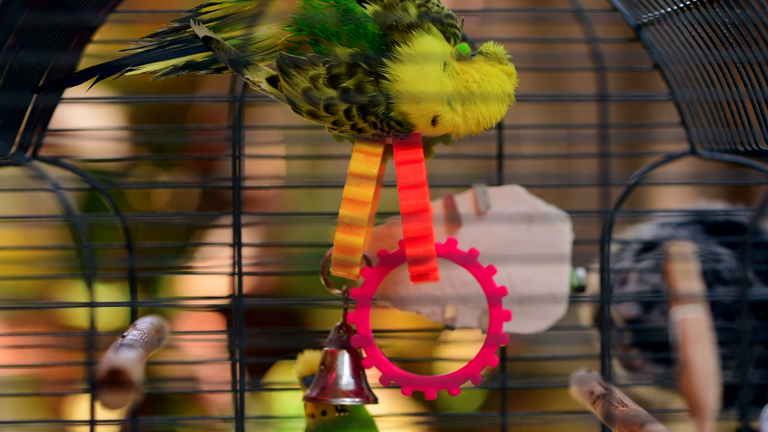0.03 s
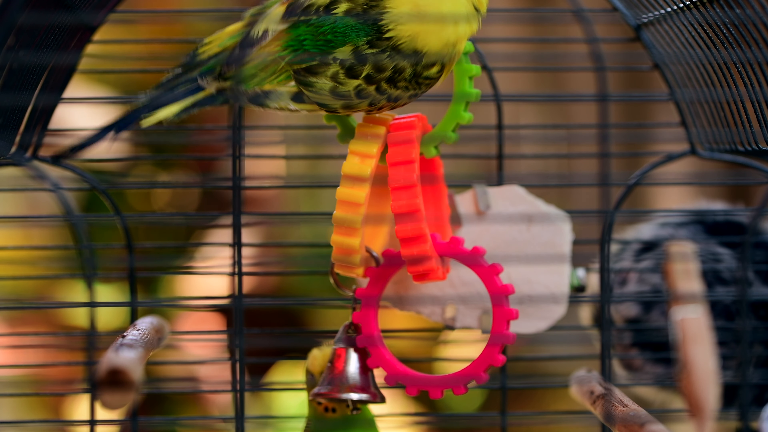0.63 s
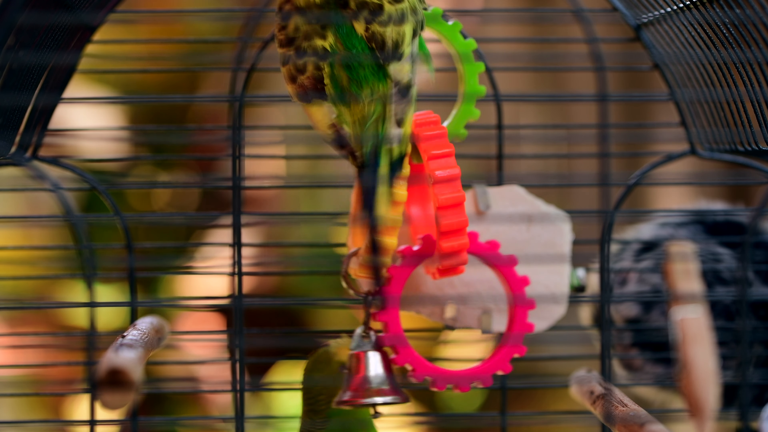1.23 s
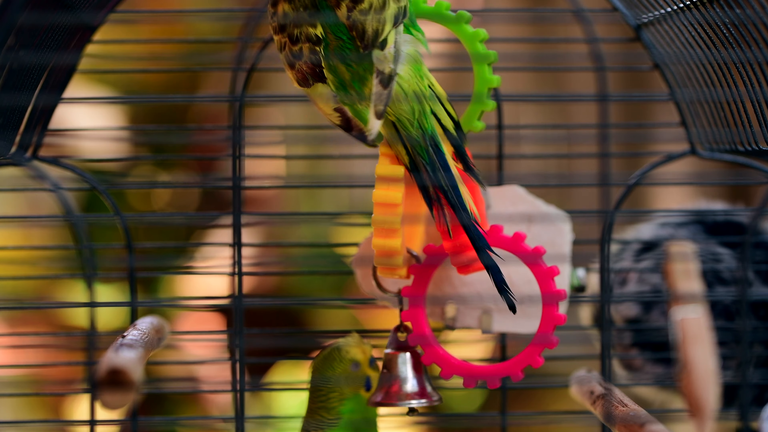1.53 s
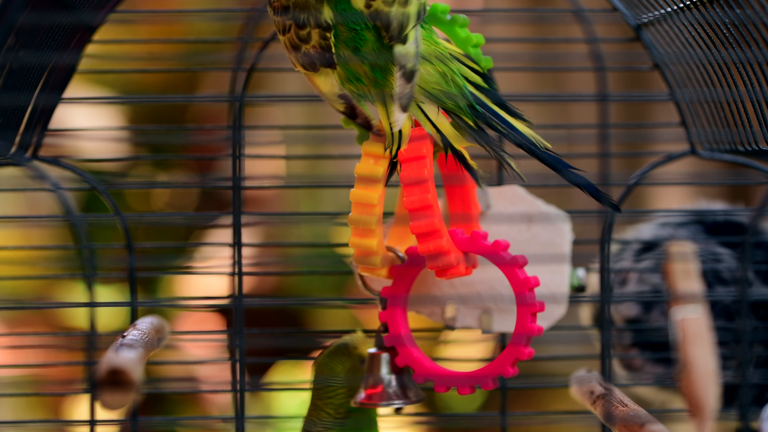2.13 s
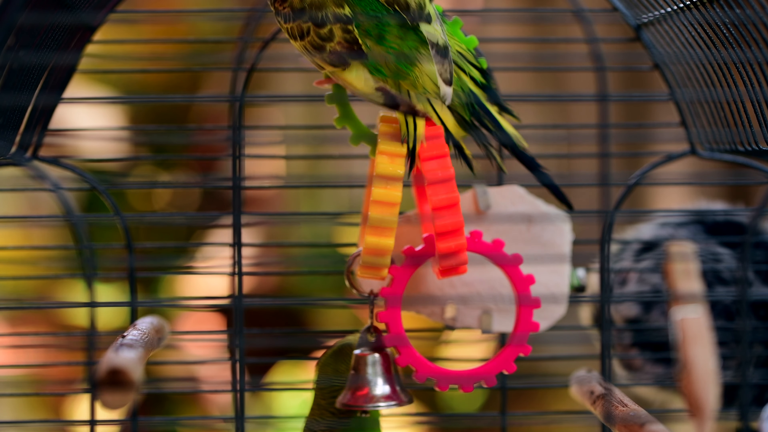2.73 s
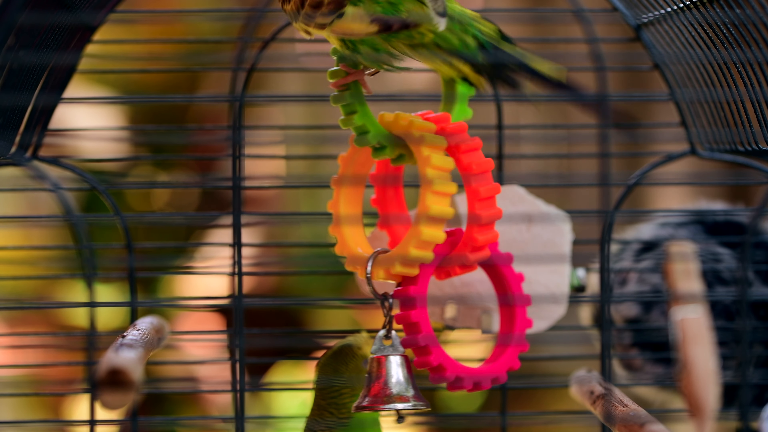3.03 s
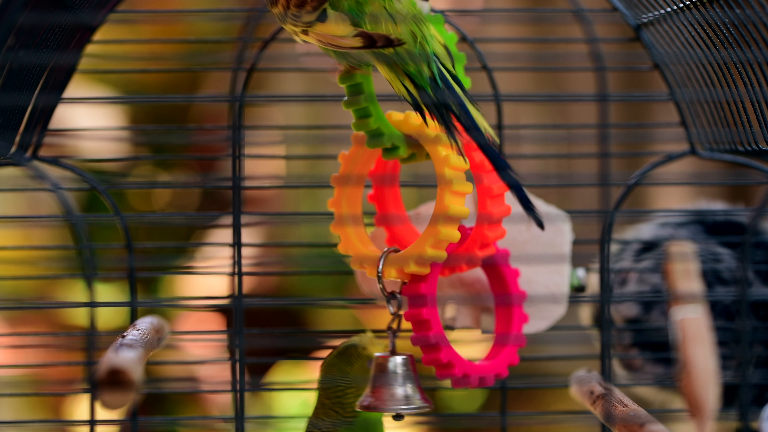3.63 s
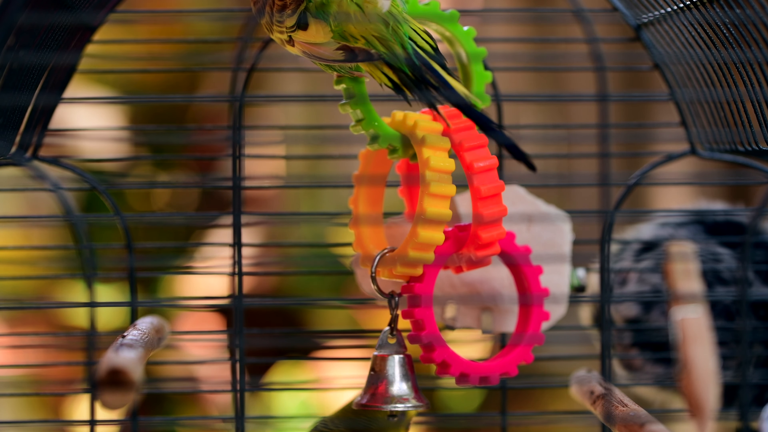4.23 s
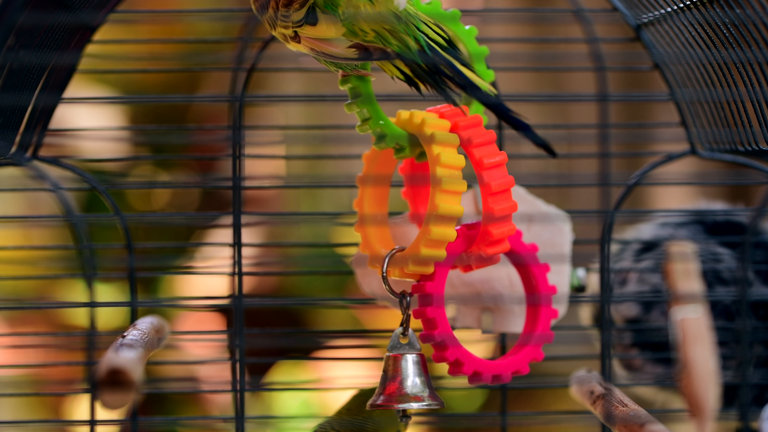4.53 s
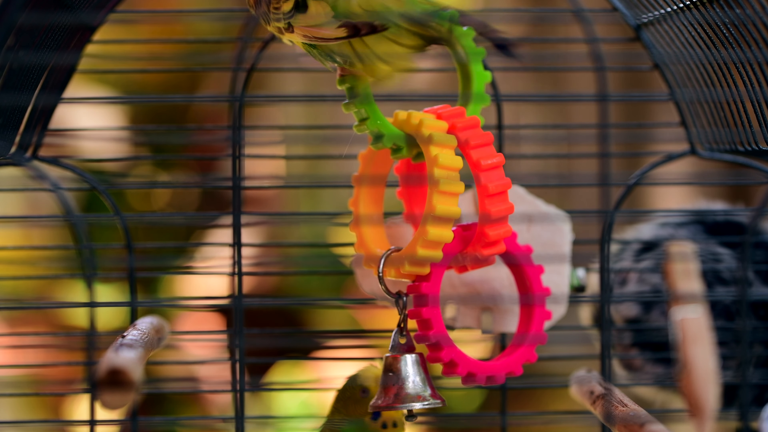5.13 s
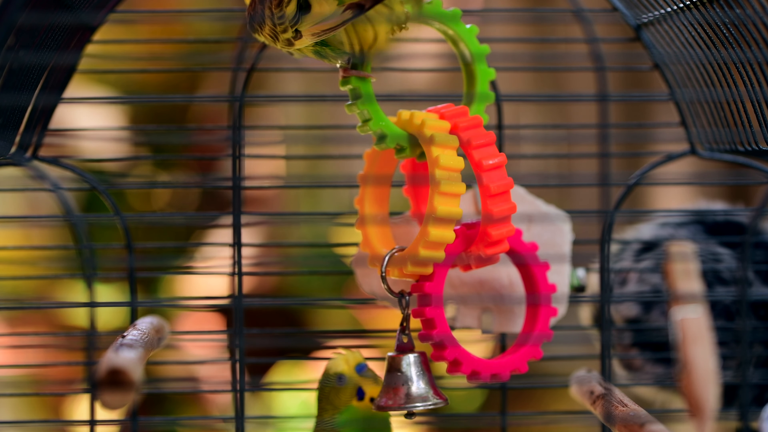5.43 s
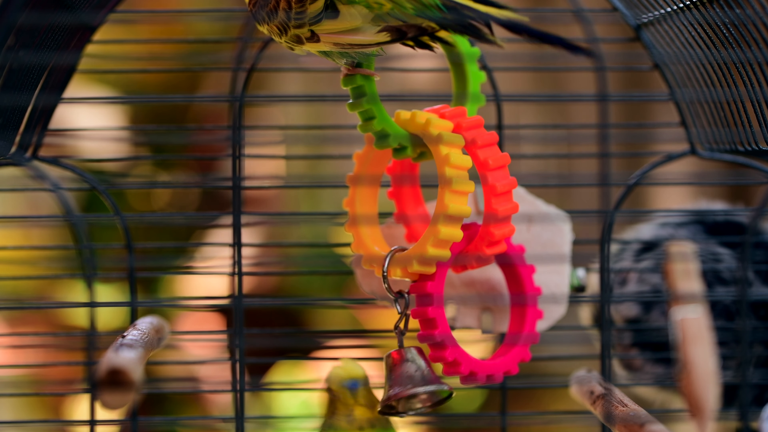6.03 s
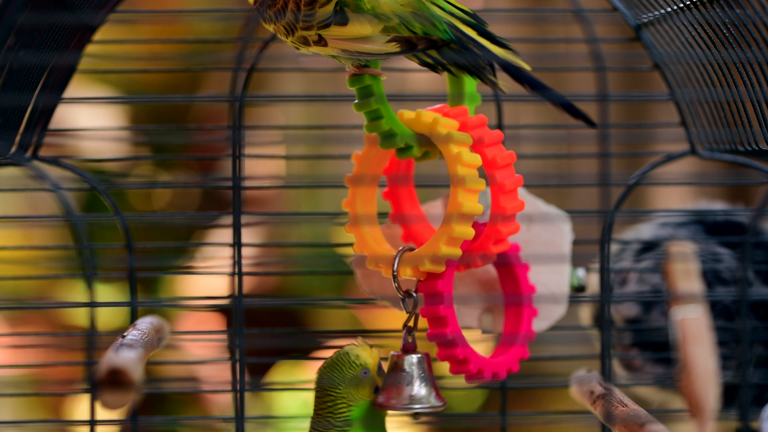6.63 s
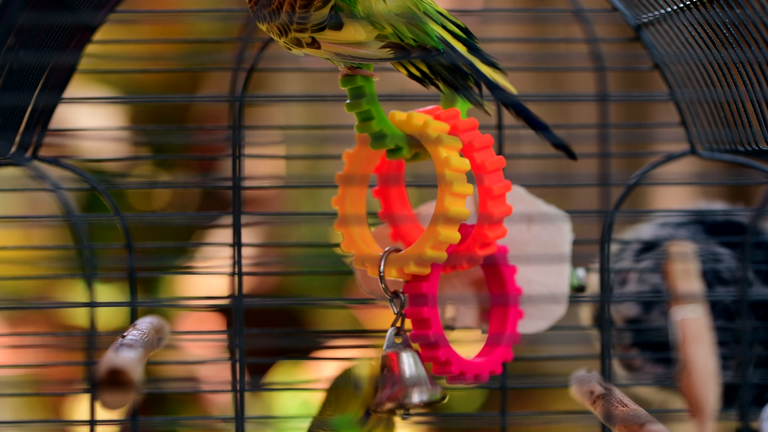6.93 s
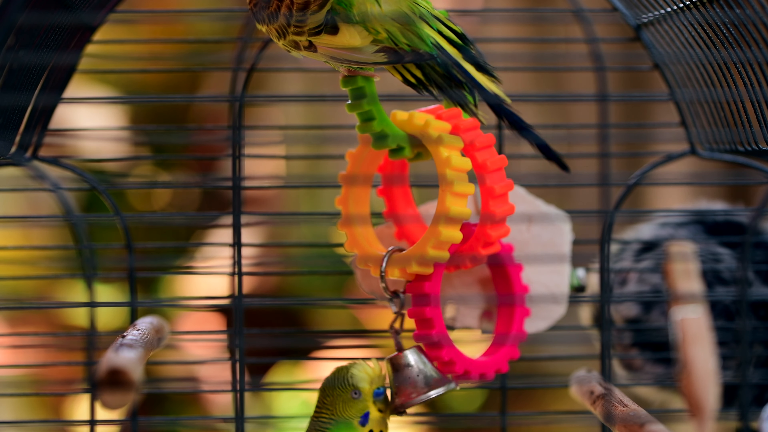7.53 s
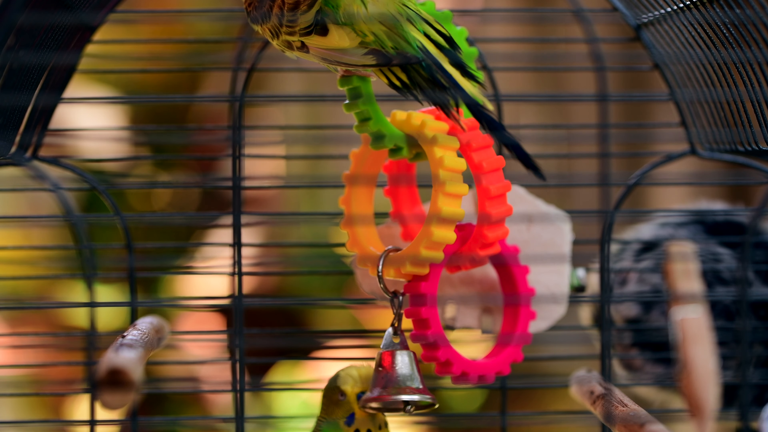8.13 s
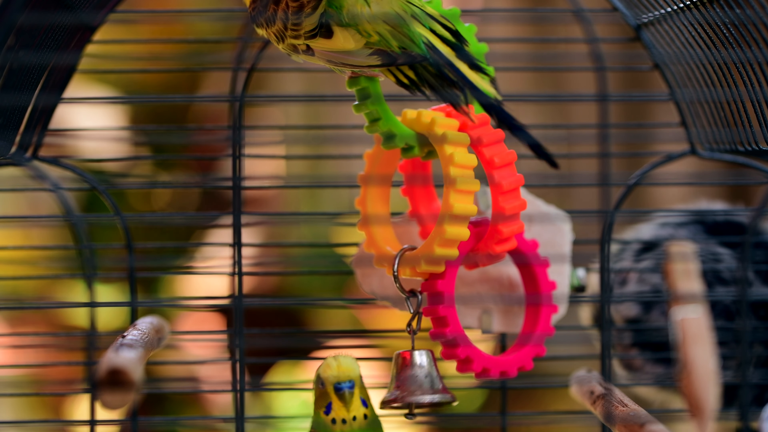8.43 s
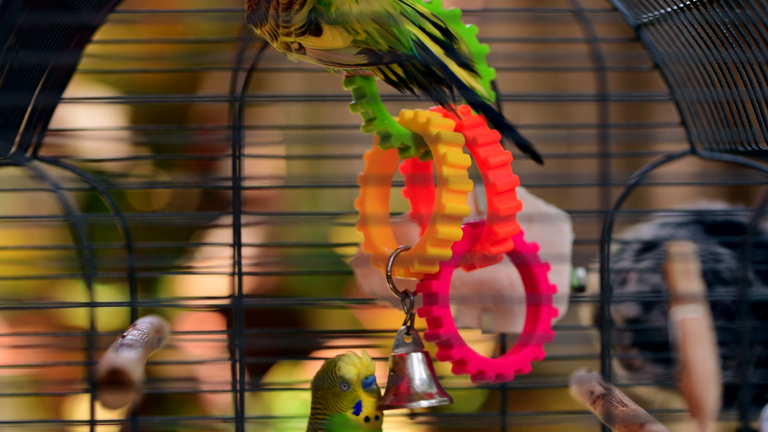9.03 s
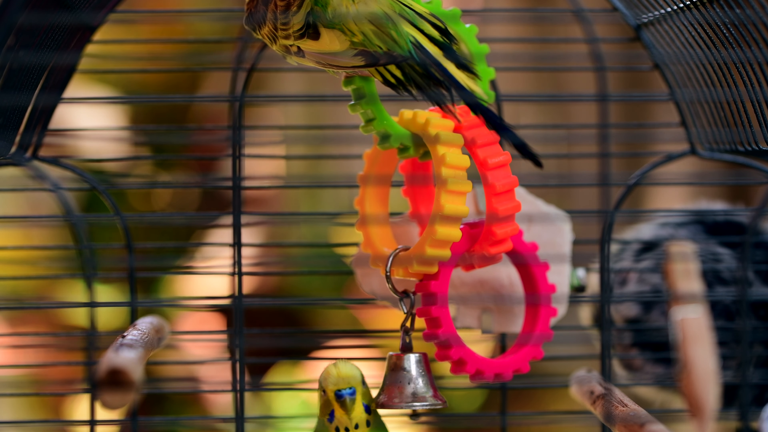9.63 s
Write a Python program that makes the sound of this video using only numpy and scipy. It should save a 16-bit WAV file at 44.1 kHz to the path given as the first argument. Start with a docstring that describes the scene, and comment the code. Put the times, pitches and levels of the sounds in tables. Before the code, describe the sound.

In a quiet room with a faint hum, a caged budgerigar is heard up close. It opens with a loud falling chirp and tiny, soft warbled notes, then breaks into a string of raspy squawks. As these slow down, a nudged toy bell tinkles gently, and a burst of sharp chirps and a last squawk follow. Light ticks of beak and claws on plastic come now and then.

```python
"""A budgerigar chirps and warbles softly, close by in a quiet room, one of two in a wire cage.
Then comes a run of harsh, rattling squawks and a few more whistled chirps. The whistles are nearly pure
sliding tones; in a squawk the syrinx (the bird's voice box) snaps open about 170 times a second.
Now and then a nudged toy bell rings, and beaks and claws tick on plastic rings.
The cage and walls add a faint echo, and the loudest bursts overload the microphone."""
import sys
import numpy as np
from scipy import signal
from scipy.fft import rfft, irfft, next_fast_len
from scipy.io import wavfile
from scipy.ndimage import map_coordinates

SR = 44100
rng = np.random.default_rng(int(sys.argv[2]) if len(sys.argv) > 2 else 0)


def log_audio(samples):
    """Write samples as a 16-bit WAV file to the path given in sys.argv[1]."""
    # one column per channel
    frames = np.atleast_2d(samples).T
    # limit to full scale, then quantise
    limited = np.clip(frames, -1, 1)
    pcm = np.round(limited * 32767).astype(np.int16)
    wavfile.write(sys.argv[1], SR, pcm)


N = 435266
TIME = np.arange(N) / SR

# The tone colour of the quiet room. Each row: frequency in Hz, relative level in dB.
ROOM_COLOUR = [(20, -9), (50, -1), (95, -9), (170, -10), (300, -17), (750, -21), (1200, -27), (2100, -39),
               (5200, -47), (15500, -55)]
# How alike the room sounds on the left and right. Each row: frequency in Hz, likeness from 0 to 1.
ROOM_LIKENESS = [(60, 0.6), (400, 0), (950, 0.7), (3800, 0.4), (12000, 0.04)]
# A faint hum. Each row: pitch in Hz, level in dB.
HUM_TONES = [(39, -58), (237, -59)]
# The tone colour of the echo. Each row: frequency in Hz, relative level in dB.
ECHO_COLOUR = [(200, -0.5), (1200, -4.5), (2700, 5.5), (5300, 0), (7000, -1), (15000, -7.5)]
# Where the calling bird is. Each row: time in seconds, left level minus right level in dB.
BIRD_PLACE = [(.4, -1.8), (3.5, -3.4), (4.2, -1.7), (5.3, -1.7), (5.8, -3.2), (8.2, -1.8), (9.1, .6)]
# How the left side lags. Each row: frequency in Hz, phase shift in radians (negative is later).
LEFT_PHASE = [(1200, 0), (4700, -.55), (7750, -.6), (11200, -2.4), (15000, -2.6)]

# Beaks and claws on plastic. Each row: start in seconds, peak in dB, favoured pitch in Hz.
TAPS = [(0.831, -34, 1820), (0.875, -41, 1700), (0.951, -35, 1490), (1.045, -24.5, 2020),
        (1.053, -27, 2000), (3.36, -30.5, 4970), (4.0202, -25.5, 2700), (4.0252, -27, 2680),
        (9.667, -27.5, 1890), (9.725, -30, 1820)]
# The plastic's own tones. Each row: pitch in Hz, relative level in dB, seconds to fade by 60 dB.
PLASTIC_TONES = [(942, -9.5, .008), (1550, -4.5, 0.0018), (2200, 2, 0.0063), (2880, 2, 0.0018),
                 (5500, -3, 0.0021), (12500, -18, 0.0024)]
# The pitches of the bell's tones in Hz, lowest first.
BELL_PITCHES = [2293, 7097, 10230, 10652, 14690]
# How each of those tones rings. Each row: relative level in dB, seconds to fade by 60 dB.
BELL_RINGING = [(-4.5, 0.93), (2, 0.42), (-10, 0.48), (3.5, 0.28), (-6, .34)]
# The clapper hits the bell. Each row: start in seconds, level in dB, extra dB for the lowest tone.
BELL_STRIKES = [(3.27, -78.5, 24), (3.81, -69, 19), (6.176, -31, 0), (6.621, -43.5, -8.5),
                (7.09, -32, -4.5), (7.678, -44, -14), (8.163, -32, -12.5), (8.846, -39.5, 5)]

# How throat and beak favour a whistle's overtones. Each row: frequency in Hz, boost in dB.
BEAK_COLOUR = [(2000, 25), (3400, -9.5), (4700, -10.5), (6300, -1.5), (7300, 11.5), (9000, -0.5),
               (14000, 15.5)]
# Soft sliding notes. Each row: start and length in seconds, first and last pitch in Hz,
# level in dB, roughness from 0 to 1.
WARBLE_NOTES = [(0.384, 0.01, 1490, 1780, -40, 0.5), (0.973, 0.0203, 800, 1310, -51.5, 0.85),
                (0.989, 0.015, 1280, 1010, -43, 0.3), (1.154, 0.009, 1680, 1880, -37.5, 0.3),
                (1.208, 0.027, 1174, 1410, -45.5, 0.3), (1.282, 0.0062, 1860, 2410, -40, 0),
                (1.43, 0.015, 2415, 1670, -42.5, 0.64), (1.439, 0.015, 1570, 2180, -35, 0.4),
                (1.594, 0.017, 2014, 1570, -44.5, 0.6), (1.726, 0.0061, 2080, 2760, -37.5, 0.2),
                (2.599, 0.018, 900, 2210, -28.5, 0.7), (2.623, 0.048, 1650, 1254, -39, 0.05),
                (2.674, 0.071, 1073, 1073, -46, 0), (2.751, 0.0085, 3820, 3590, -37, 0.84),
                (2.787, 0.055, 2185, 1517, -31.5, 0.42), (8.707, 0.0091, 1394, 1550, -39.5, 0.37),
                (8.786, 0.016, 4050, 3330, -38.5, 0.4), (9.081, 0.02, 1330, 1630, -36, 0.05)]
# A three-note tune. Its rows read like the warble's, timed from the start of the tune.
TUNE_NOTES = [(0, 0.0087, 1550, 1940, -37, 0.21), (0.018, 0.0278, 798, 1265, -44, 0.17),
              (0.07, .013, 2430, 3110, -43.5, .3)]
# When the tune is sung. Each row: start in seconds, change of level in dB.
TUNE_REPEATS = [(1.78, -4), (1.908, -2.5), (2.041, -2), (2.173, -1)]
# Falling whistles that open a chirp and break to a lower pitch. Each row: start, break and end in
# seconds, level before and after the break in dB, pitch before and after it in Hz,
# swell shape (1 is even, 3 is early), roughness from 0 to 1.
CHIRP_SLIDES = [(0.395, 0.436, .451, -8.5, -19, 3030, 2300, 1.06, 0.1),
                (8.717, 8.758, 8.799, -29.5, -26.5, 3050, 2310, 2.05, 0.21),
                (8.897, 8.941, 8.961, -10.5, -18, 3270, 2556, 2, 0.16),
                (9.03, 9.054, 9.081, -26, -30.5, 3000, 2320, 3.2, 0.03),
                (9.827, 9.873, 9.880, -44, -46, 2930, 2200, 3, 0.33)]
# Held notes that answer the slides. Each row: start and end of the hold in seconds, pitch in Hz,
# level in dB, roughness halfway through from 0 to 1, closing drop in octaves.
HELD_NOTES = [(0.457, 0.471, 2626, -11.5, 0.18, 1.54), (8.798, 8.843, 3146, -11.5, 0.3, 0.056),
              (8.96, 8.973, 3050, -11, 0, 1.34), (9.108, 9.139, 3530, -12, 0.34, 1.335),
              (9.145, 9.167, 2685, -12, 0.46, 0.049)]
# One unbroken whistle leading into the first squawk. Each row: time in seconds, pitch in Hz,
# level in dB, roughness from 0 to 1.
GLIDE_PATH = [(3.366, 3054, -42, 0.35), (3.377, 4650, -45.5, 0.3), (3.392, 4200, -35, 0.74),
              (3.403, 3580, -22, 0.43), (3.417, 3040, -25.5, 0), (3.426, 1850, -32, 0.2),
              (3.431, 3340, -50, 0.7), (3.444, 2700, -29, 0.25), (3.463, 2930, -26.5, 0.25),
              (3.479, 1584, -37.5, 0.07), (3.488, 2146, -32, 0.04), (3.502, 1277, -44.5, 0.1),
              (3.53, 2650, -29.5, 0.2), (3.546, 3750, -20, 0.3), (3.554, 3236, -17, 0.9),
              (3.576, 2985, -9, .6)]

# The tone colour of the airy rasp. Each row: frequency in Hz, relative level in dB.
RASP_COLOUR = [(400, -50), (750, -35), (1300, -16), (2800, -2.5), (6000, 1), (7800, -6.5), (10200, -9.5),
               (11800, -21.5), (15000, -16.5)]
# Dry clicks near the start of some squawks. Each row: start in seconds, peak in dB.
SYRINX_POPS = [(3.389, -20), (6.137, -13.5), (7.054, -18.5), (8.133, -12.5)]
# Squawks, each with two halves and a break between them. Each row: start, break, end and rise time in
# seconds, level before and after the break in dB, level change at the break in dB, smear at the break
# from 0 to 1, shriek pitch before and after in Hz, a lower tone's pitch in Hz, then the relative
# levels in dB of that lower tone, the throat and the bright edge above the shriek.
SQUAWK_CALLS = [(3.576, 3.599, 3.633, .003, -14, -13, 4.5, 0.1, 4223, 5335, 2714, -10, -19, -10),
                (4.078, 4.158, 4.229, 0.021, -11.5, -13.5, -6.5, 0.84, 5980, 6160, 3582, -11, -21.5, -12),
                (4.318, 4.387, 4.451, 0.013, -11.5, -11.5, -2, .8, 6165, 6520, 3530, -9.5, -25, -10.5),
                (4.536, 4.608, 4.669, 0.032, -10.5, -12, -3, 0.88, 5870, 6570, 3668, -8.5, -23, -7),
                (4.745, 4.802, 4.856, 0.034, -11, -14, 2, 0.81, 5740, 6330, 3140, -7.5, -24, -7.5),
                (4.919, 4.977, 5.020, 0.029, -11.5, -13, -0.5, 0.83, 5620, 5930, 3290, -9, -21, -5),
                (5.095, 5.176, 5.247, 0.023, -12.5, -11, -4, 0.42, 5950, 5910, 3098, -10, -23.5, -21),
                (5.327, 5.398, 5.457, 0.04, -10.5, -11.5, -1.5, 0.67, 5513, 6030, 3220, -10.5, -21.5, -15),
                (5.6, 5.668, 5.744, 0.032, -13.5, -15, -2, 0.87, 5580, 6200, 2863, -10.5, -30, -14.5),
                (5.826, 5.904, 5.976, 0.033, -15.5, -14, -5, .5, 6100, 6250, 3193, -10.5, -28.5, -29),
                (6.148, 6.195, 6.276, 0.003, -19, -14.5, -6.5, 0.74, 5880, 6050, 2956, -8, -23, -31.5),
                (6.549, 6.614, 6.651, 0.027, -15.5, -14, -3.5, 0.53, 6220, 5790, 3170, -9, -18, -17.5),
                (7.064, 7.112, 7.152, .006, -14.5, -14, -3.5, .5, 6430, 5940, 2858, -9.5, -17.5, -19),
                (7.6, 7.658, 7.709, 0.03, -15.5, -16, -6.5, 1, 6320, 5960, 3170, -4, -17, -13),
                (8.124, 8.186, 8.229, 0.024, -15, -14.5, -6.5, 0.63, 6124, 5620, 2780, -8.5, -16, -17.5),
                (9.297, 9.352, 9.423, .006, -20, -16.5, -9, 0.61, 5700, 6100, 3193, 2.5, -22, -26.5)]
# The moments, in seconds, when the bird forces a squawk hardest.
PUSH_TIMES = [3.616, 4.108, 4.207, 4.364, 4.422, 4.568, 4.583, 4.625, 4.82, 4.961, 4.993, 5.421]


def from_db(db):
    """Turn decibels into a number to multiply a sound by."""
    return 10 ** (np.asarray(db) / 20)


def rms_one(x):
    """Scale a sound so that its average power is 1."""
    return x / np.sqrt(np.mean(x ** 2) + 1e-20)


def at_hz(points, hz):
    """Read a table between its frequencies, giving every octave equal room."""
    table_hz, value = np.transpose(points)
    return np.interp(np.log(np.maximum(hz, 1)), np.log(table_hz), value)


def coloured(x, colour):
    """Give a noise a tone colour and an average power of 1."""
    n = next_fast_len(x.shape[-1], True)
    gain = from_db(at_hz(colour, np.arange(n // 2 + 1) * SR / n))
    return rms_one(irfft(rfft(x, n) * gain, n)[..., :x.shape[-1]])


def wander(n, rate_hz):
    """A smooth random wobble, about 1 in size, with rate_hz new values a second."""
    knots = rng.standard_normal(min(n, SR // 8) // 2 + 4)[:int(n * rate_hz / SR) + 4]
    return map_coordinates(knots, [np.arange(n) * rate_hz / SR], order=3, mode="mirror")


def phase_of(hz):
    """How far a wave of changing pitch has turned, in radians."""
    return 2 * np.pi * np.cumsum(hz) / SR


def filtered(x, order, hz, kind):
    """Keep the lows, the highs or a band; a higher order cuts more sharply."""
    return signal.sosfilt(signal.butter(order, hz, kind, fs=SR, output="sos"), x)


def ring(x, hz, ring_s):
    """Let a sound set one tone ringing, which fades by 60 dB in ring_s."""
    decay, step = from_db(-60 / (ring_s * SR)), 2 * np.pi * hz / SR
    return signal.lfilter([0, np.sin(step)], [1, -2 * decay * np.cos(step), decay * decay], x + 1e-18)


def fade(t, rise_s, fall_s):
    """Round off the start and end of a note."""
    fade_in = np.sin(np.pi / 2 * np.clip((t - t[0]) / rise_s, 0, 1)) ** 2
    fade_out = np.sin(np.pi / 2 * np.clip((t[-1] - t) / fall_s, 0, 1)) ** 2
    return fade_in * fade_out


def add(out, start, x):
    """Mix a sound in at a start time in seconds."""
    i = max(int(start * SR), 0)
    out[i:i + len(x)] += x[:N - i]


def room_tone(air_db=-45):
    """The quiet room: low rumble and hiss, with a wavering hum."""
    n = next_fast_len(N, True)
    shared, opposed = rfft(rng.standard_normal((2, n)))
    alike = np.clip(at_hz(ROOM_LIKENESS, np.arange(len(shared)) * SR / n), 0, 1)
    noise = irfft(np.sqrt(1 + alike) * shared + np.sqrt(1 - alike) * opposed * [[1], [-1]], n)
    air = coloured(noise, ROOM_COLOUR)[:, :N]
    hum = sum(np.sqrt(2) * from_db(db) * np.sin(phase_of(hz + 3 * wander(N, 8.6)))
              for hz, db in HUM_TONES)
    return from_db(air_db) * air + hum


def high_hiss(level_db=-64.5, throb_db=3.5, throb_hz=4.12, band_hz=(6700, 8700)):
    """A faint high hiss throbs about four times a second."""
    hiss = filtered(rng.standard_normal((2, N)), 2, band_hz, "band")
    throb = np.cos(2 * np.pi * throb_hz * (TIME + .039))
    return rms_one(hiss) * from_db(level_db + throb_db * throb)


def echo(x, walls_s=0.35, walls_db=-22.0, cage_s=0.057, cage_db=-13.5):
    """Sound bounces quickly off the cage and lingers faintly between the walls."""
    t = TIME[:SR // 2]
    walls = coloured(rng.standard_normal((2, len(t))), ECHO_COLOUR)
    walls *= from_db(-60 * t / walls_s) * (t > .006)
    scatter = rng.standard_normal(len(t)) + rng.standard_normal((2, len(t)))  # sides partly alike
    cage = coloured(scatter, ECHO_COLOUR) * from_db(-60 * t / cage_s) * (t > .001)
    bounces = (from_db(walls_db) * rms_one(walls) + from_db(cage_db) * rms_one(cage)) / np.sqrt(len(t))
    return signal.fftconvolve(x[None], bounces, axes=1)[:, :N]


def off_centre(x, pan_db):
    """Sound from one side reaches the left channel a little later and at another level."""
    n = next_fast_len(N, True)
    shift = at_hz(LEFT_PHASE, np.arange(n // 2 + 1) * SR / n)
    late = irfft(rfft(x, n) * np.exp(1j * shift), n)[:N]
    return np.array([late * from_db(pan_db / 2), x * from_db(-pan_db / 2)])


def plastic_ticks(tap_s=0.0036, scrape_db=-24, scrape_s=.012, focus_db_per_octave=32.0):
    """A sharp tap and a brief scrape ring the plastic, mostly near the tap's favoured pitch."""
    out, t = np.zeros(N), TIME[:SR // 10]
    for start, peak_db, centre_hz in TAPS:
        force = np.exp(-t / tap_s) + from_db(scrape_db) * np.exp(-t / scrape_s)
        contact = rng.standard_normal(len(t)) * force
        tick = sum(ring(contact, hz, ring_s)
                   * from_db(db - focus_db_per_octave * abs(np.log2(hz / centre_hz)))
                   for hz, db, ring_s in PLASTIC_TONES)
        tick = filtered(tick, 3, hz=950, kind="high")  # the ticks carry no bass
        tick = filtered(tick, 1, hz=4500, kind="low")
        add(out, start, from_db(peak_db) * tick / np.abs(tick).max())
    return out


def toy_bell(twin_ratio=1.0025, twin_db=-9):
    """The nudged bell is not quite round, so each tone has a weaker twin that makes it pulse."""
    out, t = np.zeros(N), TIME[:SR]
    for start, level_db, lowest_db in BELL_STRIKES:
        for k, (hz, (db, ring_s)) in enumerate(zip(BELL_PITCHES, BELL_RINGING)):
            phase = 2 * np.pi * hz * t
            pair = np.sin(phase) + from_db(twin_db) * np.sin(twin_ratio * phase)
            add(out, start, pair * from_db(level_db + db + lowest_db * (k == 0) - 60 * t / ring_s))
    return out


def whistle(t, hz, level_db, rough, edge_s=0.0015, flutter_hz=150, flutter_depth=.85, breath_db=-35):
    """A nearly pure tone; when rough, the syrinx flutters and shakes its pitch and level."""
    rough, n = np.clip(rough, 0, 1), len(t)
    flutter = np.sin(phase_of(flutter_hz * (1 + 0.15 * wander(n, 120))))
    shake = rough * (0.074 * flutter + 0.07 * wander(n, 1800))
    phase = phase_of(hz * (1 + shake + .005 * wander(n, 700)))
    tone = np.sin(phase)
    for k, overtone_db in enumerate((-29, -41, -46, -48), 2):
        gain = from_db(overtone_db + at_hz(BEAK_COLOUR, k * hz) + 2.2 * rough + 6.4 * wander(n, 220))
        fray = 2.2 * rough * wander(n, 2000)
        tone += gain * np.sin(k * phase + fray) * (k * hz < SR / 2)
    # air rushing past the beak adds a bright fizz
    fizz = rms_one(np.diff(rng.standard_normal(n + 1)))
    fizz *= from_db(breath_db + 10 * rough + 2.8 * wander(n, 300))
    throb = 1 + flutter_depth * rough * flutter
    return (np.sqrt(2) * tone + fizz) * from_db(level_db) * throb * fade(t, edge_s, edge_s)


def warble(waver=0.049):
    """Tiny slides sung with a closed beak, among them the repeated tune."""
    out = np.zeros(N)
    repeats = [(at + offset, length, first_hz, last_hz, db + gain_db, rough)
               for at, gain_db in TUNE_REPEATS
               for offset, length, first_hz, last_hz, db, rough in TUNE_NOTES]
    for start, length, first_hz, last_hz, level_db, rough in WARBLE_NOTES + repeats:
        t = np.arange(0, length, 1 / SR)
        hz = np.linspace(first_hz, last_hz, len(t)) * (1 + waver * wander(len(t), 900))
        add(out, start, whistle(t, hz, level_db, rough, edge_s=0.0026))
    return out


def chirp_slides(top_hz=4410, swell_db=43, break_s=0.0028, sag_octaves=0.23, waver=0.048):
    """A whistle swells as it slides down, then breaks to a lower pitch and sags."""
    out = np.zeros(N)
    for start, break_at, end, upper_db, lower_db, upper_hz, lower_hz, swell, rough in CHIRP_SLIDES:
        t = np.arange(start, end, 1 / SR)
        to_go = np.interp(t, [start, break_at], [1, 0])
        sag = sag_octaves * np.interp(t, [break_at, end], [0, 1])
        dropped = .5 + .5 * np.tanh((t - break_at) / break_s)
        hz = (1 - dropped) * (upper_hz + (top_hz - upper_hz) * to_go) + dropped * lower_hz * 2 ** -sag
        level_db = (1 - dropped) * (upper_db - swell_db * to_go ** swell) + dropped * lower_db
        add(out, start, whistle(t, hz * (1 + waver * wander(len(t), 127.3)), level_db, rough))
    return out


def held_notes(scoop_octaves=.3, scoop_s=0.0057, swell_db=14, flick_s=0.014):
    """A whistle scoops up, swells and steadies, then flicks down and fades."""
    out = np.zeros(N)
    for start, end, pitch_hz, note_db, rough, flick_octaves in HELD_NOTES:
        t = np.arange(start, end + flick_s, 1 / SR)
        to_go = np.interp(t, [start, end], [1, 0])
        flicked = np.maximum(t - end, 0) / flick_s
        octaves = -scoop_octaves * np.exp((start - t) / scoop_s) - flick_octaves * flicked ** 1.4
        level_db = note_db - swell_db * to_go ** 3 - 30.5 * np.tanh(flicked)
        add(out, start, whistle(t, pitch_hz * 2 ** octaves, level_db, 2 * rough * to_go))
    return out


def glide():
    """A whistle winds down, then climbs and flutters as it turns into a squawk."""
    out = np.zeros(N)
    times, *columns = np.transpose(GLIDE_PATH)
    t = np.arange(times[0], times[-1], 1 / SR)
    hz, level_db, rough = [np.interp(t, times, column) for column in columns]
    add(out, times[0], whistle(t, hz, level_db, rough))
    return out


def pops(decay_s=0.0019):
    """The syrinx opens just once: a dry click with the colour of the rasp."""
    out, t = np.zeros(N), TIME[:SR // 50]
    for start, peak_db in SYRINX_POPS:
        pop = coloured(rng.standard_normal(len(t)), RASP_COLOUR) * np.exp(-t / decay_s)
        add(out, start, from_db(peak_db) * pop / np.abs(pop).max())
    return out


def creak(t, lowest_hz=541, octaves_per_s=55, length_s=0.028, level_db=-40):
    """The slack syrinx creaks briefly, rising from t = 0; with t running backwards it falls."""
    age = np.minimum(t, length_s)
    phase = phase_of(lowest_hz * 2 ** (octaves_per_s * age) * (1 + 0.087 * wander(len(t), 700)))
    return from_db(level_db) * sum(np.sin(k * phase) for k in (1, 2, 3)) * np.sin(np.pi * age / length_s)


def rattle(smear, rate_hz=171, attack_share=0.13, open_share=.48, leak=0.11):
    """The syrinx snaps open in bursts that smear can blur; gives their strength and arch of pitch."""
    n = len(smear)
    cycle = np.cumsum(rate_hz * (1 + (.055 + .2 * smear) * wander(n, 150))) / SR % 1
    opening = np.minimum(cycle / attack_share, 1) / (1 + (cycle / open_share) ** 7)
    blur = np.clip(leak + smear, 0, 1)
    bursts = rms_one((1 - blur) * opening + blur * .5 * from_db(6.3 * wander(n, 900)))
    arch = np.sin(np.pi * np.minimum(cycle / open_share, 2) / 2) - np.pi / 4
    return bursts, arch


def beak(call, level_db, cut_hz=980, hollow_hz=4200, half_shut_db=-11):
    """Cut the bass from a call; in softer calls the half-shut beak also dulls one band."""
    call = filtered(call, 3, cut_hz, "high")
    depth = np.clip(.15 * (half_shut_db - level_db), 0, 1)
    return call - depth * signal.lfilter(*signal.iirpeak(hollow_hz, 4.5, fs=SR), call)


def squawks(break_s=.015, fall_s=.021, push_s=0.0053, push_db=4, strain_db=-12.5, edge_ratio=1.42,
            shriek_db=1.5, overtone_db=-21, rasp_db=-3):
    """Bursts of shriek and rasp run together part way through, then settle at a new pitch and level."""
    out = np.zeros(N)
    for (start, break_at, end, rise_s, first_db, second_db, break_db, smear,
         first_hz, second_hz, low_hz, low_db, throat_db, edge_db) in SQUAWK_CALLS:
        t = np.arange(start, end, 1 / SR)
        n, from_break = len(t), (t - break_at) / break_s
        broken = np.exp(-from_break ** 2)  # 1 at the break, 0 far from it
        after = .5 + .5 * np.tanh(from_break)  # 0 in the first half, 1 in the second
        level_db = first_db + (second_db - first_db) * after
        strain = from_db(.45 * (level_db - strain_db))  # louder calls are more ragged
        bursts, arch = rattle(smear * broken)
        swell = np.clip((t - start) / rise_s, 0, 1) ** 1.8
        pressure = np.maximum(swell, from_db(-25)) * fade(t, 0.0022, fall_s) ** .73
        # the pitch sags at low pressure, slumps at the break and strays from burst to burst
        tension = (.75 + .25 * np.sqrt(pressure)) * (1 - .08 * broken + .055 * wander(n, 110))
        shriek_hz = (first_hz + (second_hz - first_hz) * after) * tension * (1 + 0.17 * arch)
        ragged = 0.077 * strain * (.5 + smear * (1 + broken))
        phase = phase_of(shriek_hz * (1 + ragged * wander(n, 3500)))
        shriek = np.sin(phase) + from_db(overtone_db) * np.sin(2 * phase)
        edge = np.sin(phase_of(edge_ratio * shriek_hz * (1 + ragged * wander(n, 3500))))
        bend = tension * (1 + .28 * arch) * (1 + pressure) / 2
        lower, throat = [
            np.sin(phase_of(hz * bend * (1 + stray * wander(n, 90) + .09 * wander(n, 2500))))
            for hz, stray in ((low_hz, .06), (1750, .13))]
        noise = rng.standard_normal(n)
        patchy_colour = [(hz, db + 3 * rng.standard_normal()) for hz, db in RASP_COLOUR]
        rasp = coloured(noise, patchy_colour) / np.sqrt(2)
        # the shriek needs pressure: at both ends the throat comes through instead
        voice = (np.sqrt(pressure) * (from_db(shriek_db) * shriek + from_db(edge_db) * edge)
                 + from_db(low_db) * lower
                 + from_db(throat_db + 7.7 * (1.5 - pressure)) * throat
                 + from_db(rasp_db) * np.sqrt(strain) * rasp)
        push = sum(np.exp(-((t - at) / push_s) ** 2) for at in PUSH_TIMES)
        gain = from_db(level_db + break_db * broken + push_db * push + 0.58 * wander(n, 170))
        call = beak(bursts * rms_one(voice) * pressure * gain, level_db)
        add(out, start, call + bursts * (creak(t - start) + creak(end - t)))
    return out


def scene():
    """Birds off to one side and the bell straight ahead, with the cage and the room around them."""
    birds = chirp_slides() + held_notes() + glide() + squawks() + pops() + warble() + plastic_ticks()
    bell = toy_bell()
    pan_db = np.interp(TIME, *np.transpose(BIRD_PLACE))
    return off_centre(birds, pan_db) + bell + echo(birds + bell) + room_tone() + high_hiss()


def record(dry, overload_at=0.66, thump_db=-8.5, thump_hz=(115, 420), top_hz=16400):
    """The loudest bursts overload the microphone and make low thumps; the highest treble is cut."""
    rounded = dry / (1 + dry ** 8) ** (1 / 8)
    excess = np.maximum(np.abs(dry) - overload_at, 0)
    thumps = filtered(excess + 1e-18, 2, thump_hz, "band")
    treble_cut = signal.cheby2(16, 60, top_hz, fs=SR, output="sos")
    return signal.sosfilt(treble_cut, rounded - from_db(thump_db) * thumps)


dry = scene()
out = record(dry)
log_audio(out)
```